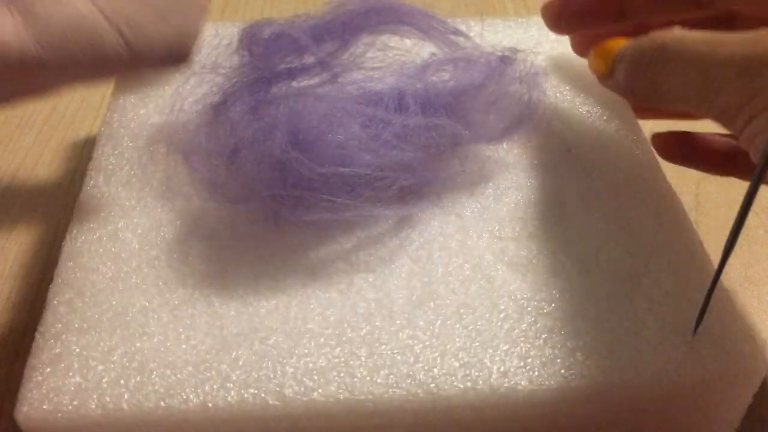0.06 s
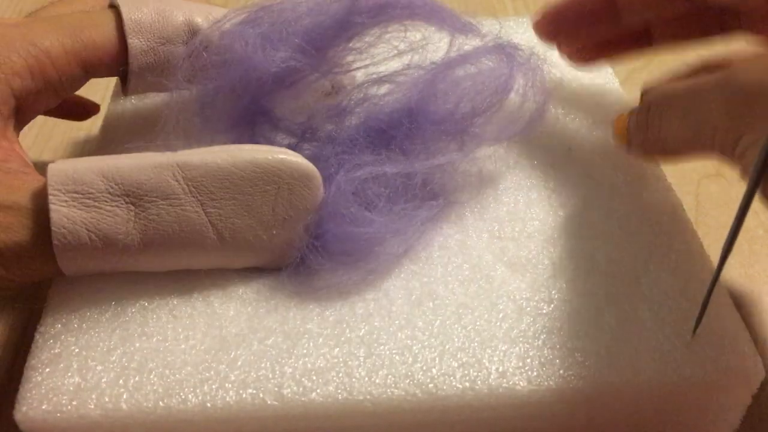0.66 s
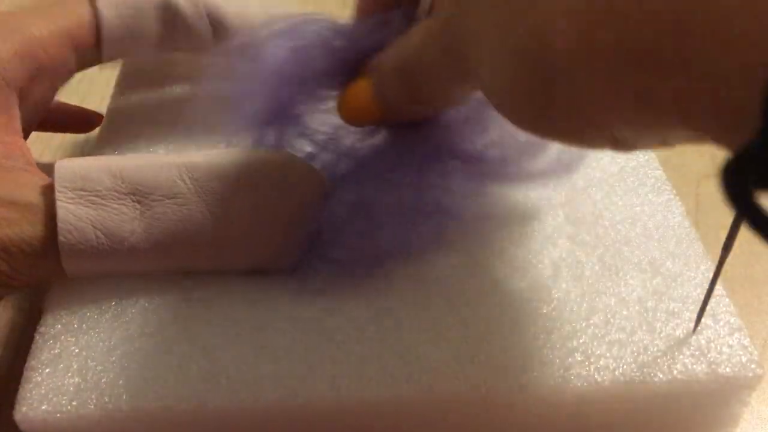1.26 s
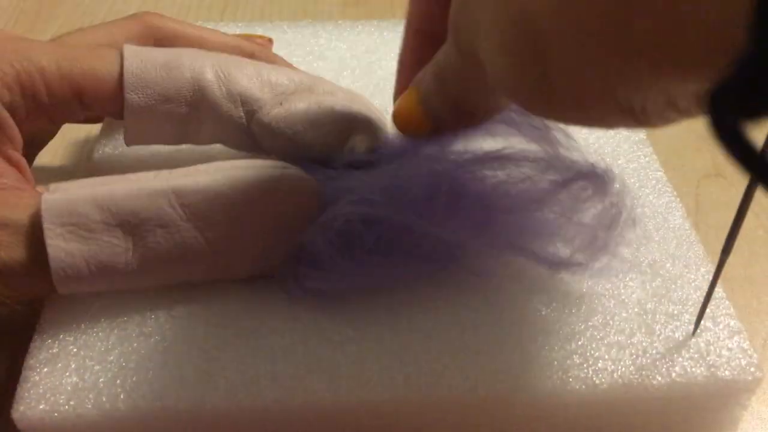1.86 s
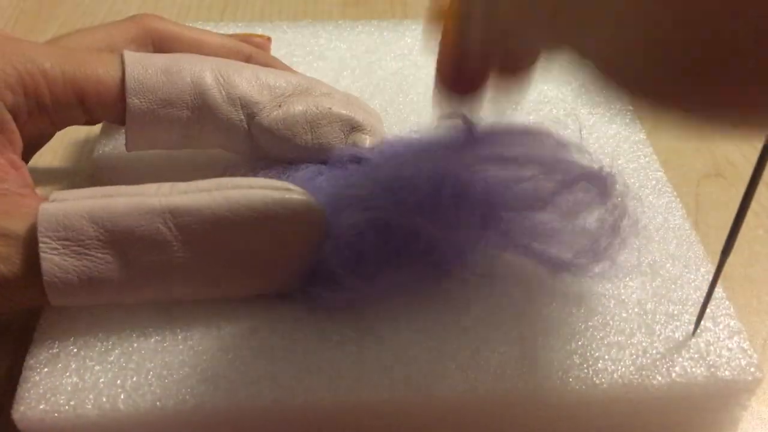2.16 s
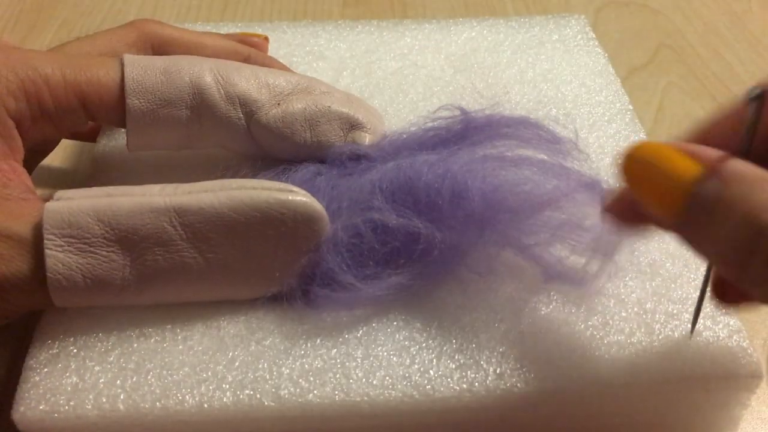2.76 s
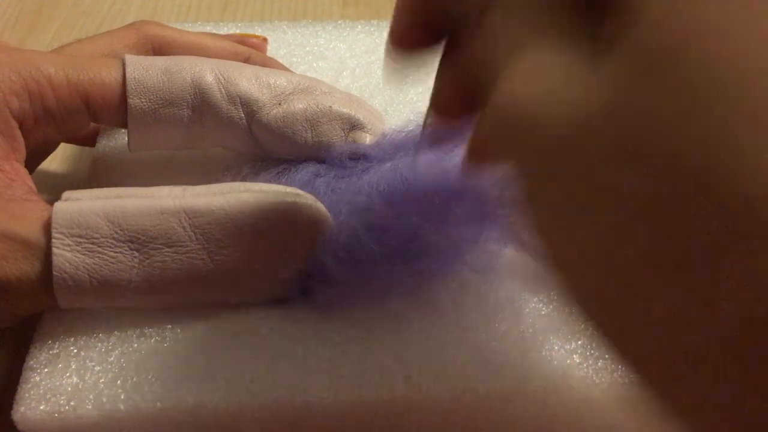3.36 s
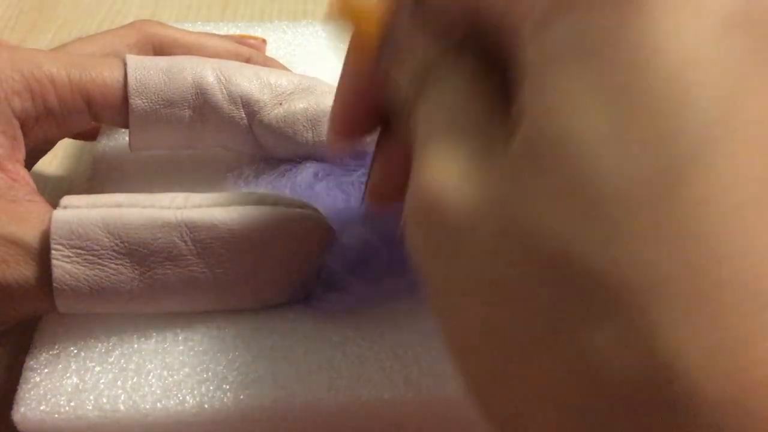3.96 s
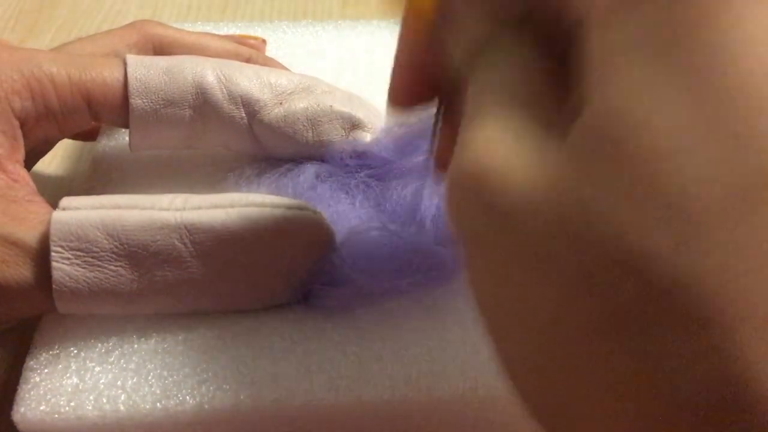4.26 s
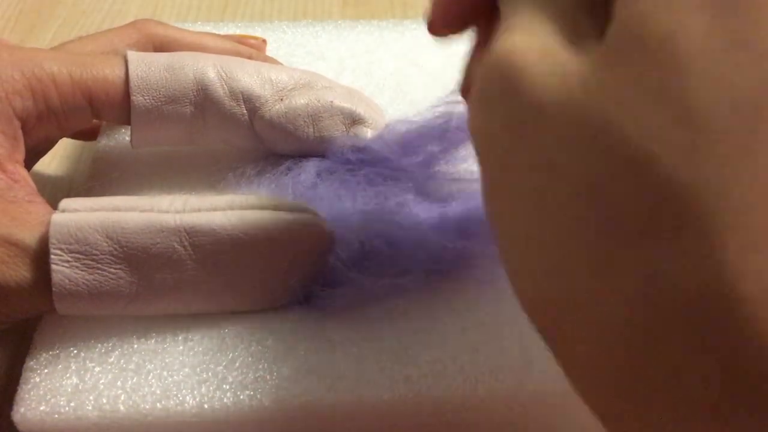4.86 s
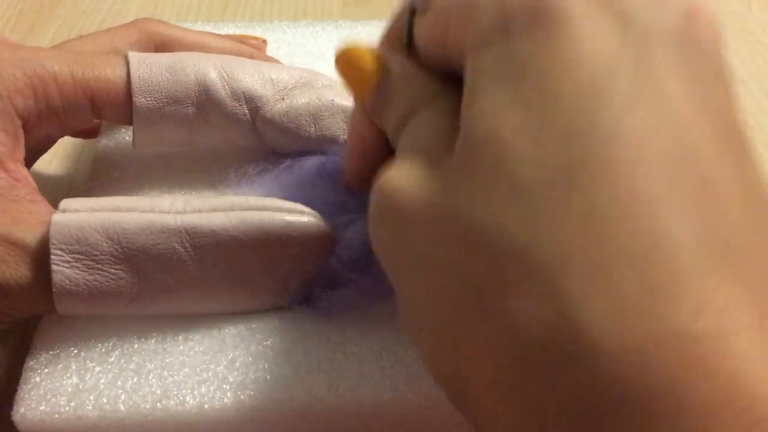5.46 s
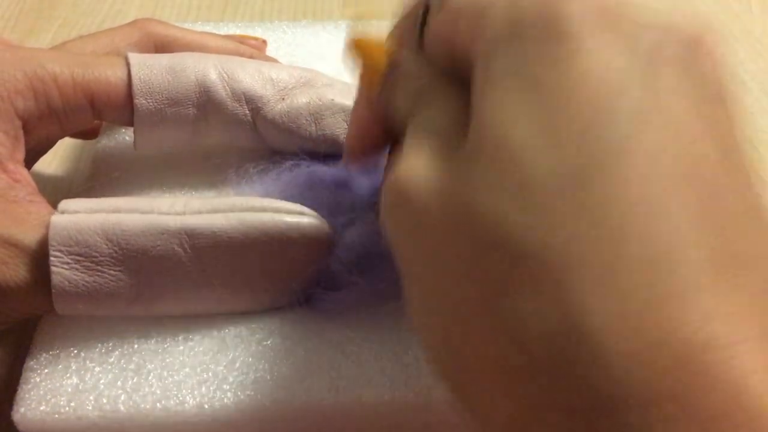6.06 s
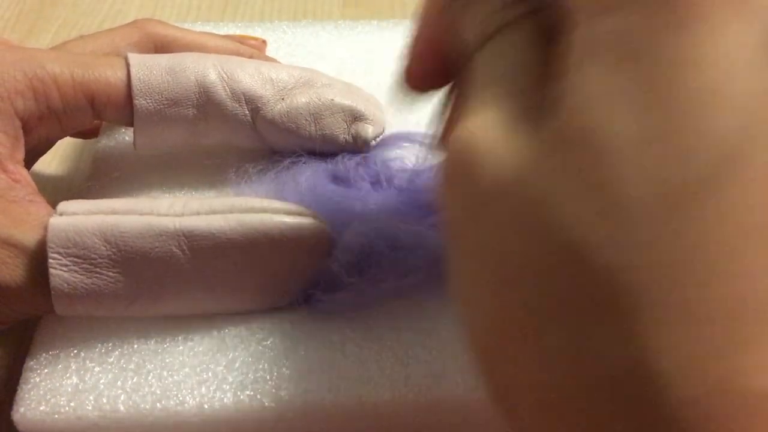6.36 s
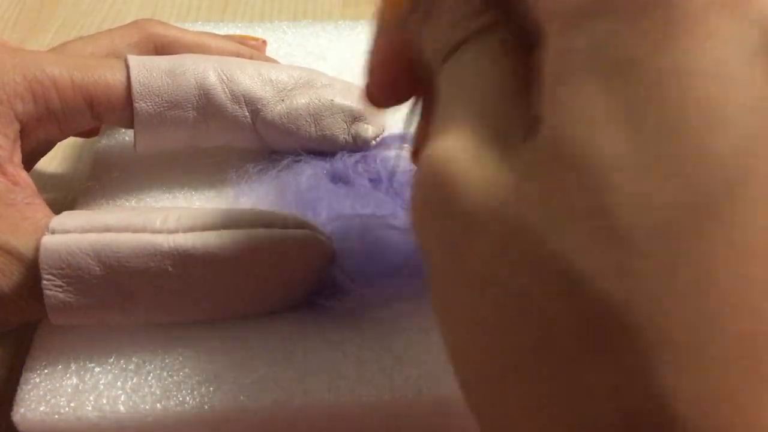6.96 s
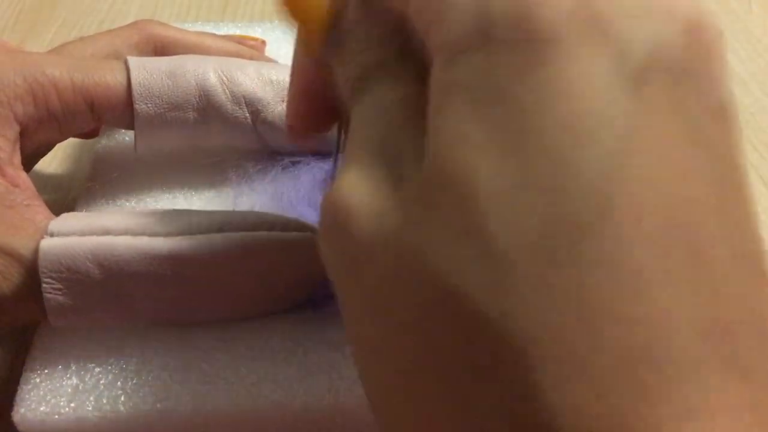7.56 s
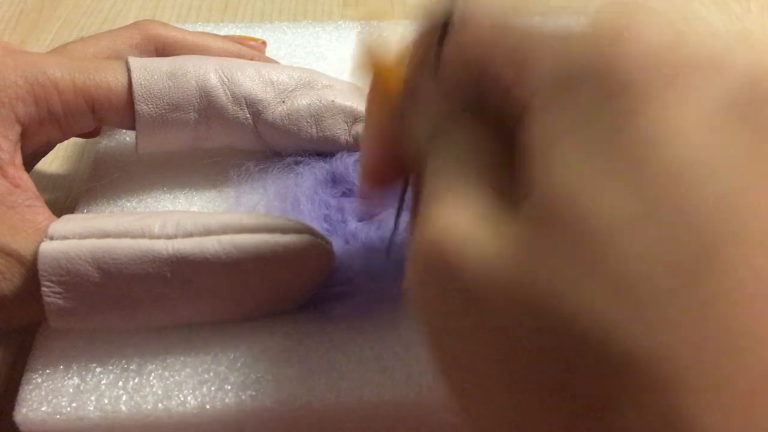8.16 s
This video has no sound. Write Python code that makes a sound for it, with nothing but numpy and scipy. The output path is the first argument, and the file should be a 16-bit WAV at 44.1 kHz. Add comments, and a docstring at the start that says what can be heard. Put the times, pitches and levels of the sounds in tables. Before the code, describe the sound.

Fingers softly rub and shift a tuft of wool, its fibres faintly crackling. There is a tiny tink, and a needle scrapes briefly out of a foam pad. Then the barbed needle stabs through the wool into the foam about five times a second, each stab a crunchy snap with a small knock, followed by a soft rasp and often a hollow tick. The microphone is close, in a small, faintly humming room.

```python
"""A barbed felting needle stabs through wool into a foam pad, about five times a second, close to one mic.
In each stab the force builds until the foam gives with a snap, amid tiny slips that crackle and knock
the pad; a soft rasp, often with a hollow tick, follows as the needle comes back up. Before the stabbing,
fingers arrange the wool, something tinks, and the parked needle is drawn out of the pad.
The place is a table in a small furnished room that hums faintly."""
import sys
import numpy as np
from scipy import signal
from scipy.fft import rfft, irfft
from scipy.io import wavfile

SR = 44100
rng = np.random.default_rng(int(sys.argv[2]) if len(sys.argv) > 2 else 0)


def int16_out(signal):
    """Quantize to a 16-bit WAV file."""
    q = np.round(np.clip(np.atleast_2d(signal).T, -1, 1) * 32767)
    wavfile.write(sys.argv[1], SR, q.astype(np.int16))


N = 362943
T = np.arange(N) / SR

# stabs: tip enters t/s, foam gives t/s, needle stops t/s, level/dB, relative crackle level/dB
STABS = [(3.446, 3.455, 3.484, -22.7, -7.3), (3.695, 3.699, 3.73, -24, -11),
         (3.905, 3.926, 3.929, -24.5, -12), (4.113, 4.123, 4.14, -25, -4.5),
         (4.33, 4.333, 4.352, -24, -4.5), (4.521, 4.531, 4.546, -23, -7.5), (4.735, 4.76, 4.771, -29, -7),
         (4.979, 4.991, 5.003, -21, -7), (5.427, 5.449, 5.462, -27, -8), (5.678, 5.69, 5.705, -23.5, -9.5),
         (5.889, 5.896, 5.91, -27, -9), (6.084, 6.099, 6.119, -28, -10), (6.282, 6.302, 6.313, -26, -7.5),
         (6.467, 6.483, 6.499, -26, -5.5), (6.656, 6.668, 6.691, -27.5, -8.5),
         (6.851, 6.866, 6.878, -24, -6.5), (7.048, 7.057, 7.074, -23, -8.5),
         (7.243, 7.255, 7.271, -25.7, -8.5), (7.432, 7.437, 7.458, -21.5, -9),
         (7.629, 7.649, 7.663, -28.5, -10), (7.834, 7.845, 7.862, -23, -7), (8.029, 8.04, 8.056, -25, -6.5),
         (8.208, 8.224, 8.235, -22.5, -5)]
# spectrum of tearing foam: f/Hz, level/dB
FOAM_CRACKLE = [(500, -50), (1600, 13.5), (2600, -12), (3800, 7), (4900, 1), (5500, 5.5), (6700, 3.5),
                (7600, -3.5), (9500, -0.5), (10400, -5.5), (11800, -3.5), (14000, -12), (16000, -6)]
# spectrum of crackling wool fibres: f/Hz, level/dB
FIBRE_CRACKLE = [(2000, -7), (4000, -1.5), (5800, 7.5), (7600, 3.5), (9200, 3.5), (10500, -2), (12000, 2.5),
                 (16000, -6)]
USUAL_STAB_DB = -25


def undb(db):
    """Decibels to gain."""
    return 10 ** (np.asarray(db) / 20)


def unit(x):
    """Scale to rms 1."""
    return x / np.sqrt(np.mean(x ** 2) + 1e-18)


def add(track, s, x):
    """Mix x into the track from time s."""
    at = int(s * SR) + np.arange(len(x))
    inside = (at >= 0) & (at < N)
    track[at[inside]] += x[inside]


def through(x, response):
    """Pass x through an impulse response."""
    return signal.fftconvolve(x, response)[:len(x)]


def colour(points, tilt_db=0, size=512):
    """Unit-energy impulse response of a (f/Hz, level/dB) spectrum; the treble tilts tilt_db an octave."""
    hz, db = np.transpose(points)
    grid = np.maximum(np.fft.rfftfreq(size, 1 / SR), 1)
    shape_db = np.interp(np.log(grid), np.log(hz), db) + tilt_db * np.log2(np.maximum(grid / 2500, 1))
    # folding the cepstrum makes the response causal
    cepstrum = irfft(np.log(undb(shape_db)))
    cepstrum[1:size // 2] *= 2
    cepstrum[size // 2 + 1:] = 0
    return unit(irfft(np.exp(rfft(cepstrum)))) / np.sqrt(size)


def wander(per_s):
    """Smooth random drift with a spread near 1."""
    knots = rng.standard_normal(400)
    return np.interp(T * per_s, np.arange(len(knots)), knots)


def room_tone(air_db=-49.5, waver=0.16):
    """Low room rumble and faint hiss, with a few wavering hum tones."""
    # spectrum of the rumble and hiss: f/Hz, level/dB
    air_spectrum = [(20, -34), (35, -17), (56, 4.5), (85, -2), (130, -1), (215, -5), (270, -6.5),
                    (350, -11.5), (480, -19.5), (800, -23.5), (2000, -32), (4000, -39), (9000, -42.5),
                    (16000, -45.5)]
    # hum tones: f/Hz, level/dB
    hum_tones = [(59.2, -62), (140, -59.5), (183, -58), (220.7, -57.5)]
    air = through(rng.standard_normal(N), colour(air_spectrum, size=8192)) * undb(air_db)
    hum = np.zeros(N)
    for hz, db in hum_tones:
        amplitude = undb(db) * np.sqrt(2) * (1 + waver * wander(7))
        hum += amplitude * np.sin(2 * np.pi * hz * T + 1.7 * wander(7.2))
    return air + hum


def slips(size, per_s, spread_db):
    """Friction as random tiny impulses of uneven strength, rms 1."""
    hit = rng.random(size) < per_s / SR
    strength = undb(spread_db * np.clip(rng.standard_normal(size), -2, 2))
    return unit(hit * strength * rng.choice([-1, 1], size))


def hands(rub_db=1.0, hollow_db=-5, hollow_width_hz=450, size=20000):
    """Fingers in leather guards shift the wool: a hollow rub, while single fibres crackle."""
    # strokes and tugs: middle t/s, length/s, rub level/dB, fibre level/dB
    strokes = [(.021, .028, -58, -63), (.237, .057, -60.5, -65.5), (.408, .08, -65, -70),
               (.638, .1, -58.5, -63.5), (.874, .093, -58, -67), (.997, .085, -55.5, -69),
               (1.244, .036, -54.5, -67), (1.382, .13, -63.5, -62.5), (1.6, .34, -62, -67),
               (1.735, .07, -57.5, -69), (1.985, .14, -58, -67.5), (2.084, .06, -54, -64.5),
               (3.245, .18, -77, -68.5), (3.653, .22, -62.5, -66), (4.277, .11, -67, -66),
               (5.25, .34, -59.5, -64.5), (7.194, .14, -57.5, -64)]
    # spectrum of the rub: f/Hz, level/dB
    rub_spectrum = [(400, -33), (800, 2), (1600, -0.5), (2300, -1.5), (2900, -2.5), (3700, -3), (5000, -13),
                    (9000, -25)]
    # the hollow of the rub drops as the fingers close round the tuft: t/s, f/Hz
    hollow_pitch = [(.87, 2250), (1.0, 1600)]
    out, t = np.zeros(N), (np.arange(size) - size // 2) / SR
    for middle, length, stroke_db, fibre_db in strokes:
        hollow_hz = np.interp(middle, *np.transpose(hollow_pitch))
        # a stroke starts more abruptly than it ends
        speed = np.exp(-np.abs(2 * t / length) ** np.where(t < 0, 5, 2) / 2)
        speed *= undb(2 * wander(70)[:size])  # fibres snag and let go
        rub = through(slips(size, per_s=6000, spread_db=5.5), colour(rub_spectrum))
        hollow = signal.lfilter(*signal.iirpeak(hollow_hz, hollow_hz / hollow_width_hz, fs=SR), rub)
        rub = unit(rub + undb(hollow_db) * unit(hollow)) * undb(stroke_db + rub_db)
        fibres = through(slips(size, per_s=6700, spread_db=5), colour(FIBRE_CRACKLE)) * undb(fibre_db)
        add(out, middle + t[0], speed * (rub + fibres))
    return out


def ring(modes, loss, detune, scatter_db, size=2048):
    """Impulse response of modes damped by the foam; their pitch and weight vary from spot to spot."""
    hz, db = np.transpose(modes)[:, :, None]
    width_hz = 50 + loss * hz
    t = np.arange(size) / SR
    shift, weight = rng.standard_normal((2, len(modes), 1))
    waves = np.exp(-np.pi * width_hz * t) * np.cos(2 * np.pi * hz * (1 + detune * shift) * t)
    body = (width_hz * undb(db + scatter_db * weight) * waves).sum(axis=0)
    # the soft foam passes little above its highest mode
    return signal.sosfilt(signal.butter(2, 0.96 * hz.max(), fs=SR, output="sos"), body)


def pad(loss):
    """Response of the pad at one spot: groups of modes with dead pitches between them."""
    # modes of the pad on the table: f/Hz, level/dB
    pad_modes = [(140, -5.5), (300, -15), (400, -13), (575, -14), (705, 4), (805, 4), (922, 7.5),
                 (1135, 13.5), (1270, 9), (1390, -10), (1720, -4), (1990, 0), (2330, 1)]
    # pitches at which the pad hardly moves: f/Hz
    dead_pitches = [498, 1600]
    response = ring(pad_modes, loss, detune=.01, scatter_db=1.8)
    for hz in dead_pitches:
        response = signal.lfilter(*signal.iirnotch(hz, 10, fs=SR), response)
    return response


def tink(s=2.5935, click_db=-40, knock_db=-44, ring_hz=5500, ring_db=-70, t60_s=0.51, size=12000):
    """A tiny tap on something hard, with a faint, bright shimmer after it."""
    out, t = np.zeros(N), np.arange(size) / SR
    touch = rng.standard_normal(size) * np.exp(-t / .0014)
    click = through(touch, colour(FIBRE_CRACKLE)) * undb(click_db)
    knock = through(touch, pad(loss=0.021))
    shimmer = unit(signal.lfilter(*signal.iirpeak(ring_hz, 10, fs=SR), rng.standard_normal(size)))
    shimmer *= np.exp(-np.log(1000) * t / t60_s) * undb(ring_db)
    add(out, s, click + knock / abs(knock).max() * undb(knock_db) + shimmer)
    return out


def draw_needle():
    """The shaft of the parked needle scrapes out of the foam."""
    # course of the scrape: t/s, level/dB
    envelope = [(2.95, -71), (2.98, -51), (3.003, -45.5), (3.045, -45), (3.058, -57), (3.069, -49),
                (3.08, -82)]
    # its spectrum: f/Hz, level/dB
    spectrum = [(300, -5), (500, 3.5), (750, -6), (1300, 4), (1650, -12), (2100, 6.5), (3100, -9),
                (5500, -5.5), (8300, -3.5), (10500, -10.5), (13500, -6), (16000, -22)]
    scrape = through(slips(N, per_s=4500, spread_db=5.5), colour(spectrum))
    return scrape * undb(np.interp(T, *np.transpose(envelope), left=-120, right=-120))


def treble_tilt(s, db, crackle_db, felting_s=1.0):
    """Brightness of a stab in dB an octave; one that crackles more is brighter."""
    loose_wool = 2.3 * np.exp(-max(s - STABS[0][0], 0) / felting_s)  # the first stabs are brighter
    muffling = .22 * (db - USUAL_STAB_DB)  # a harder stab goes deeper and is duller
    return 1.45 + .15 * crackle_db - muffling + loose_wool


def snap(crack_db, tilt_db, size=2048):
    """A tougher cell wall rips within a millisecond: a sharp crack and a knock of the pad."""
    t = np.arange(size) / SR
    rip = t * np.exp(-t / .0003)
    knock = through(rip * rng.standard_normal(size), pad(loss=0.06))
    crack = through(rip * rng.standard_normal(size), colour(FOAM_CRACKLE, tilt_db))
    duration_gain = np.sqrt(.003 * SR / size)
    return duration_gain * (unit(knock) + unit(crack) * undb(crack_db))


def force_db(t, give_s, build_db_per_s=270, ease_db_per_s=300):
    """Force on the needle t seconds into a stab: it builds to 0 dB as the foam gives, then eases."""
    return -build_db_per_s * np.maximum(give_s - t, 0) - ease_db_per_s * np.maximum(t - give_s, 0)


def snaps(entry_db=0.5, give_db=2, lone_db=-2, dull_crack_db=-12, pierce_s=.0016):
    """Each stab snaps dully as the tip pierces the surface, and sharply where the foam gives."""
    # snaps as the needle comes free or grazes the pad before a stab: t/s, level/dB
    lone_snaps = [(3.0243, -43), (3.0708, -44.5), (3.895, -31), (4.3226, -24.5), (7.223, -28), (8.201, -27)]
    out = np.zeros(N)
    for start, give, _, db, crack_db in STABS:
        tilt_db = treble_tilt(start, db, crack_db)
        entry_gain = undb(db + entry_db + force_db(0, give - start))
        add(out, start + pierce_s, snap(dull_crack_db, tilt_db) * entry_gain)
        add(out, give, snap(crack_db - 1.5, tilt_db + 1) * undb(db + give_db))
    for s, db in lone_snaps:
        add(out, s, snap(dull_crack_db, tilt_db=0) * undb(db + lone_db))
    return out


def stick_slip(size, gap_s, spread_db, count=200):
    """Impulses at uneven intervals: the needle sticks, tension builds, and it slips on."""
    at = (np.cumsum(rng.uniform(.3, 1.7, count)) * gap_s * SR).astype(int)
    strength = undb(spread_db * rng.uniform(-1, 1, count)) * rng.choice([-1, 1], count)
    return unit(np.bincount(at, strength, size)[:size])


def splinter(pulses, decay_s, size=256):
    """Each impulse frays into a very short burst of noise."""
    power = through(pulses ** 2, np.exp(-2 * np.arange(size) / SR / decay_s))
    return np.sqrt(np.abs(power)) * rng.standard_normal(len(pulses))


def stabs(fine_db=-7, pad_db=-0.4, crackle_trim_db=0.6, attack_s=.0014, release_s=.002, size=5000):
    """The barbs tear through cell after cell; every slip crackles and sets the pad ringing."""
    out, t = np.zeros(N), np.arange(size) / SR - .03
    for start, give, end, db, crack_db in STABS:
        length = max(end - start, .01)
        contact = 1 / (1 + np.exp(-t / attack_s)) / (1 + np.exp((t - length) / release_s))
        squeeze = .2 * np.exp(-np.abs(t) / 0.009)  # the wool is pressed softly before the tip breaks in
        force = (contact + squeeze) * undb(force_db(np.clip(t, 0, length), give - start))
        jerks = stick_slip(size, gap_s=.0026, spread_db=7.5)
        tearing = force * (jerks + undb(fine_db) * slips(size, per_s=4000, spread_db=3))
        knocks = unit(through(tearing, pad(loss=0.04))) * undb(pad_db)
        bite = .5 + np.clip(t / .009, 0, 1)  # the crackle builds as the barbs reach the foam
        bursts = splinter(tearing * bite, decay_s=.0005)
        crackle = through(bursts, colour(FOAM_CRACKLE, treble_tilt(start, db, crack_db)))
        crackle = unit(crackle) * undb(crack_db + crackle_trim_db)
        duration_gain = np.sqrt(length * SR / size)
        add(out, start + t[0], duration_gain * undb(db) * (knocks + crackle))
    return out


def withdrawals(drag_s=0.058, pull_s=0.054, pull_width_s=0.02, snag_db=2.2, size=11000):
    """The needle drags as it turns round, then is pulled back with a fine, soft rasp."""
    # spectrum of the needle sliding back through foam and wool: f/Hz, level/dB
    rasp_spectrum = [(300, 0.5), (520, -6.5), (720, 2), (1250, 1.5), (1600, 0.5), (2200, 1), (2900, -10),
                     (3600, -5), (4900, -14.5), (6000, -11.5), (9500, -21), (10500, -23.5), (16000, -28)]
    out, t = np.zeros(N), np.arange(size) / SR
    speed = np.exp(-t / drag_s) + 0.56 * np.exp(-((t - pull_s) / pull_width_s) ** 2 / 2)
    for _, _, end, db, crack_db in STABS:
        friction = slips(size, per_s=3500, spread_db=3)
        rasp = through(friction, colour(rasp_spectrum, treble_tilt(end, db, crack_db)))
        rasp *= undb(snag_db * wander(110)[:size])  # fibres snag on the barbs
        rasp_db = -44.8 + .44 * (db - USUAL_STAB_DB)  # a harder stab rasps louder on its way out
        add(out, end, rasp * speed * undb(rasp_db))
    return out


def catches(swell_s=.0018, middle_s=0.0011, trim_db=-1.5, crackle_db=-36.5, soft_hz=1700, size=2048):
    """The lifted foam slips off the barbs in a few quick jerks: a hollow tick with a faint crackle."""
    # the foam lets go of the rising needle: t/s, level/dB
    releases = [(3.573, -22), (3.82, -19), (3.999, -27), (4.398, -28), (4.649, -22.5), (4.857, -35),
                (5.249, -31), (5.325, -13), (5.572, -23.5), (6.778, -36), (6.97, -22), (7.361, -32),
                (8.108, -30)]
    # modes of the foam surface, plucked upwards: f/Hz, level/dB
    surface_modes = [(1150, -14), (1540, 0), (1950, -3), (2370, -2), (3000, -12)]
    out, t = np.zeros(N), np.arange(size) / SR - .01
    swell = np.exp(-((t - middle_s) / swell_s) ** 2 / 2)
    for s, db in releases:
        jerks = stick_slip(size, gap_s=.0008, spread_db=4) * swell
        # the soft foam rounds off each jerk
        plucks = signal.sosfilt(signal.butter(2, soft_hz, fs=SR, output="sos"), jerks)
        tick = unit(through(plucks, ring(surface_modes, loss=.14, detune=.03, scatter_db=2)))
        crackle = through(splinter(jerks, decay_s=0.00051), colour(FOAM_CRACKLE, tilt_db=1.5))
        tick += undb(crackle_db - db) * unit(crackle)
        add(out, s + t[0], tick / abs(tick).max() * undb(db + trim_db))
    return out


def with_near_echoes(x):
    """The direct sound reaches the microphone with a few very short echoes behind it."""
    # echoes off the hands, the table and things on it: delay t/s, level/dB
    echoes = [(.0022, -26.5), (.0057, -26), (.00675, -27.5), (.0084, -17), (.0097, -20)]
    out = x.copy()
    for delay_s, db in echoes:
        add(out, delay_s, x * undb(db))
    return out


def room_reverb(x, t60_s=0.37, wet_db=-19, onset_s=0.004, treble_gain=0.53, size=16000):
    """Diffuse echo of a small furnished room, with softened treble."""
    t = np.arange(size) / SR
    noise = rng.standard_normal(size)
    low = signal.sosfilt(signal.butter(1, 3000, fs=SR, output="sos"), noise)
    envelope = np.minimum(t / onset_s, 1) * np.exp(-np.log(1000) * t / t60_s)
    tail = (low + treble_gain * (noise - low)) * envelope
    return through(x, unit(tail) / np.sqrt(size)) * undb(wet_db)


def scene():
    """Needle, pad and hands close to a mono microphone, with the room behind them."""
    close = stabs() + snaps() + withdrawals() + catches() + draw_needle() + hands() + tink()
    return (with_near_echoes(close) + room_reverb(close) + room_tone())[None]


def record(dry):
    """The recorder cuts the top treble steeply."""
    top_hz = 15750
    return signal.sosfilt(signal.ellip(10, .2, 70, top_hz, fs=SR, output="sos"), dry)


dry = scene()
out = record(dry)
int16_out(out)
```